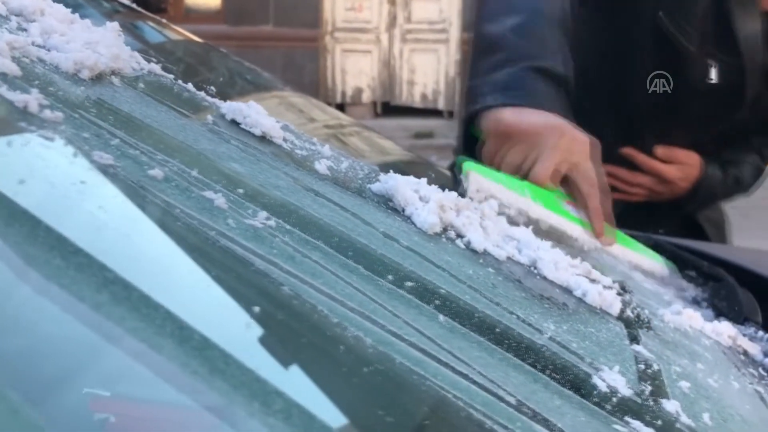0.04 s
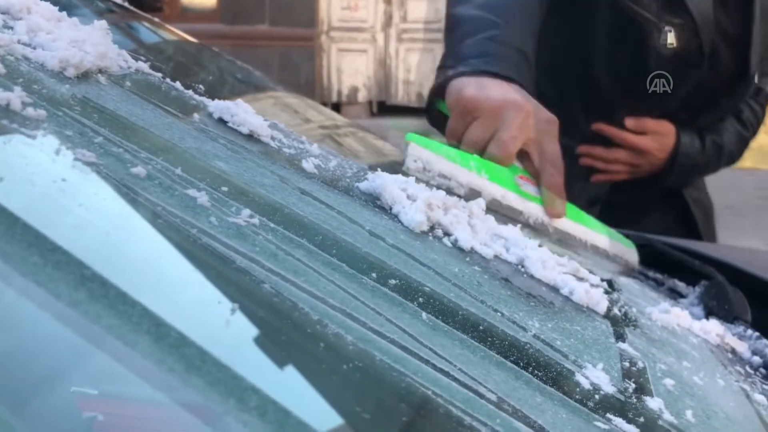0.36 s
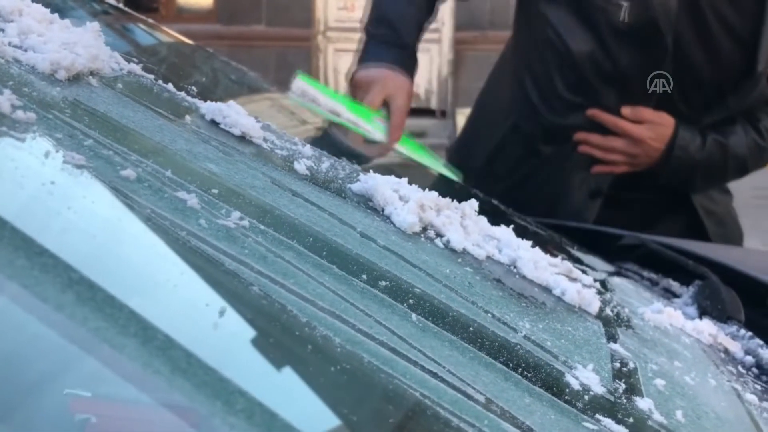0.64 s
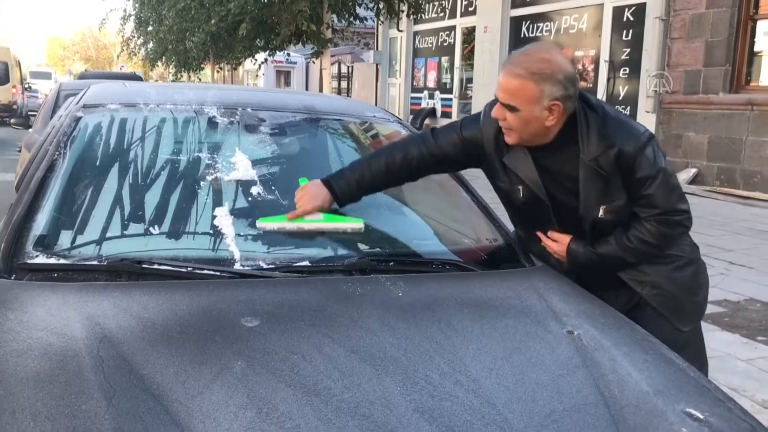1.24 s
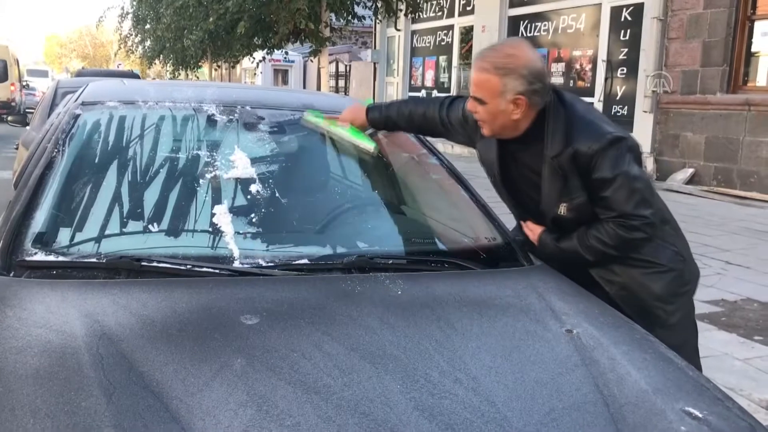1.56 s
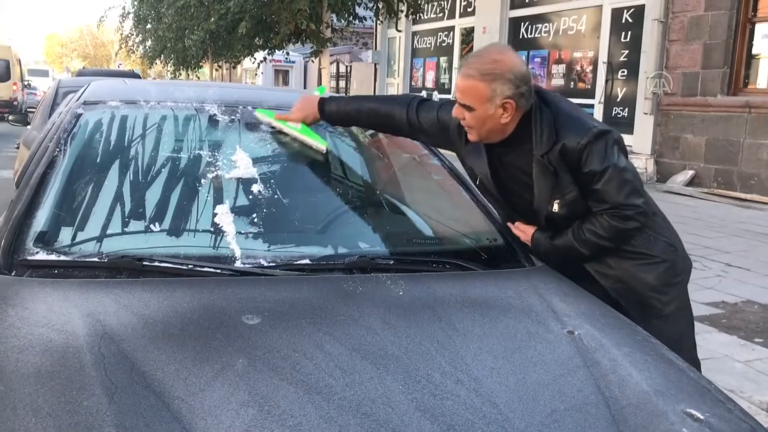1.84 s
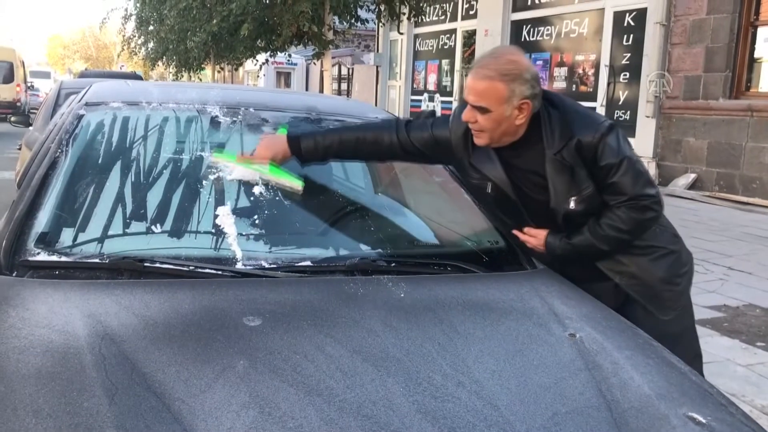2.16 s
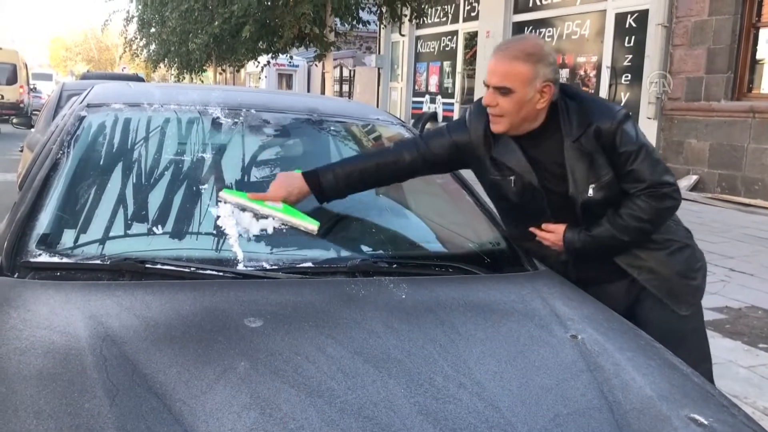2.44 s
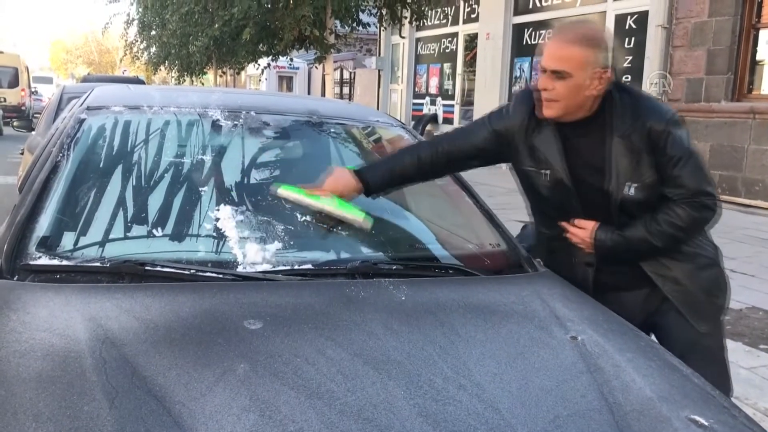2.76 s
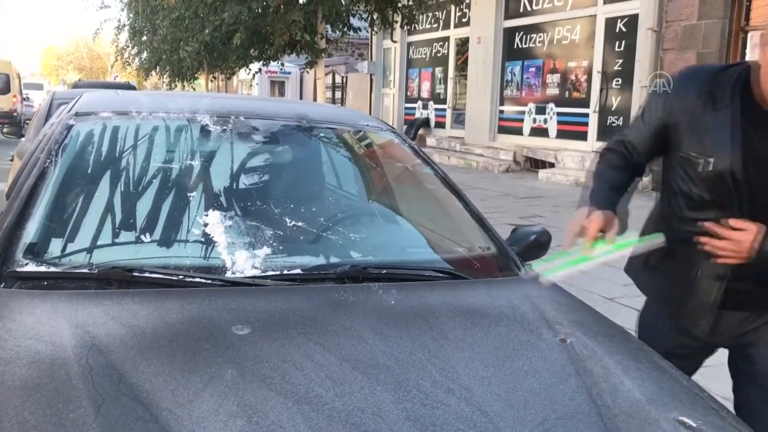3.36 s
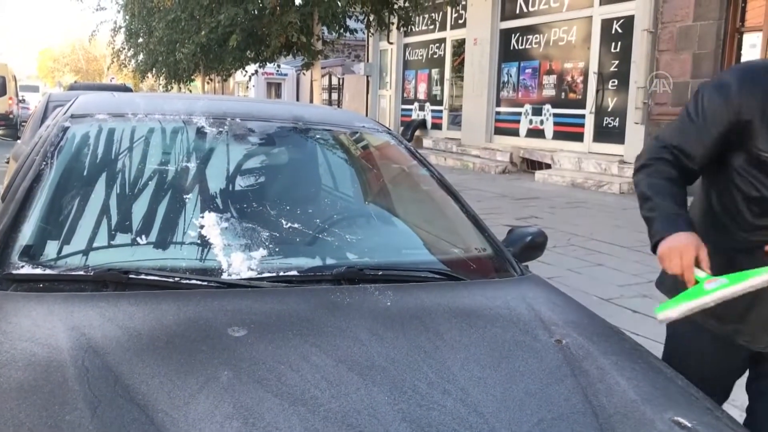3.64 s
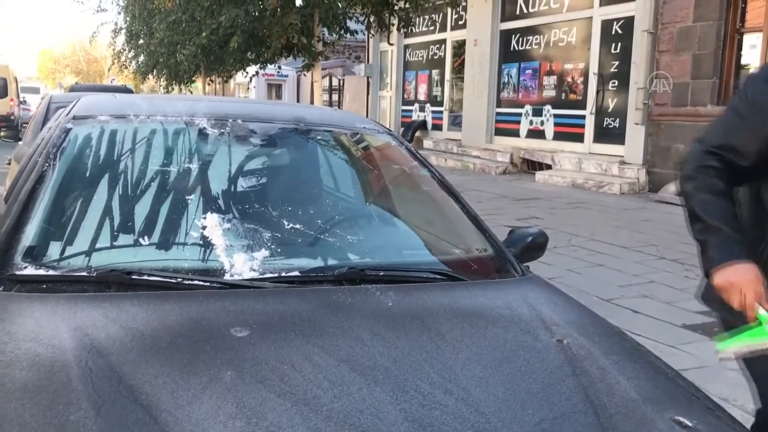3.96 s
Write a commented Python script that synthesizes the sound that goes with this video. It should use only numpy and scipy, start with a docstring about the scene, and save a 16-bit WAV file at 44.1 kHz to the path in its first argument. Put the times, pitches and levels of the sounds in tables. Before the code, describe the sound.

A plastic scraper rasps frost off a car windscreen, starting close with two tiny squeaks and short swipes. After a momentary gap near 0.8 seconds, lighter strokes sound further away. From 1.6 to 2.4 comes one long, crunching pull with snapping ice chips. The scraper knocks on the glass at 2.6 and 2.7, then swipes faintly at 3.3. Traffic rumbles throughout while a low engine drone rises, then falls away.

```python
"""A plastic scraper clears frost from a car windscreen, heard close up, then from in front of the car.
Two stick-slip squeaks and short swipes lead to one long pull down the glass: countless crystals crack
into rasp and crunch, chips snap off and the blade rings. Then the scraper knocks twice on the glass.
Traffic roars and rumbles underneath. A nearby engine gathers speed, droning low with its exhaust note
an octave above, which then falls away."""
import sys
import numpy as np
from scipy import signal
from scipy.fft import rfft, irfft
from scipy.io import wavfile
from scipy.ndimage import uniform_filter1d

SR = 44100
rng = np.random.default_rng(int(sys.argv[2]) if len(sys.argv) > 2 else 0)


def unload_wav(signal):
    """Save mono or channel-first audio to the path in sys.argv[1] as 16-bit WAV at rate SR, clipped to [-1, 1]."""
    wavfile.write(
        sys.argv[1],
        SR,
        np.round(np.clip(np.atleast_2d(signal).T, -1, 1) * 32767).astype(np.int16),
    )


N = 176400
T = np.arange(N) / SR
CLOSE_END_S, WIDE_START_S = 0.7628, 0.811  # a moment of silence separates the two perspectives
RASP_PER_S, RASP_SPREAD_DB, CRUNCH_SPREAD_DB = 14000, 1, 2.5

# spectrum of the blade rasping on frost: f/Hz, level/dB
RASP_SPECTRUM = [(150, -17), (500, -16), (1000, -0.5), (1700, -0.5), (2100, -1.5), (3300, 1.5), (5600, -2),
                 (7200, -6), (9500, -7), (12200, -11.5), (14000, -14), (15500, -15.5)]
# spectrum of breaking frost crystals: f/Hz, level/dB
CRUNCH_SPECTRUM = [(300, -15), (700, -7), (1100, -21), (1700, 6), (2100, 2.5), (2600, 6.5), (3400, 5.5),
                   (4000, -7), (9000, -10), (16000, -21)]


def amp(db):
    """Decibels to gain."""
    return 10 ** (np.asarray(db) / 20)


def unit(x):
    """Scales to rms 1."""
    return x / np.sqrt(np.mean(x ** 2) + 1e-20)


def curves(rows):
    """Turns a timed table into one automation curve per value column."""
    times, *columns = np.transpose(rows)
    return [np.interp(T, times, column) for column in columns]


def add(mix, start, sound):
    """Mixes a sound in at a start time in seconds."""
    part = mix[max(round(start * SR), 0):][:len(sound)]
    part += sound[:len(part)]


def colour(x, spectrum, tilt=0, low_hz=0):
    """EQ: shapes x to a spectrum, tilted in dB per octave and cut under low_hz; rms 1."""
    hz = np.fft.rfftfreq(len(x), 1 / SR) + 1
    points_hz, db = np.transpose(spectrum)
    gain = amp(np.interp(np.log(hz), np.log(points_hz), db) + tilt * np.log2(hz))
    return unit(irfft(rfft(x) * gain / (1 + (low_hz / hz) ** 6), len(x)))


def wander(rate_hz):
    """Smooth random modulation, rms 1."""
    hz = np.fft.rfftfreq(N, 1 / SR)
    return unit(irfft(rfft(rng.standard_normal(N)) * np.exp(-(hz / rate_hz) ** 2), N))


def fractures(per_s, spread_db):
    """Random clicks of uneven size: frost crystals giving way."""
    size = amp(spread_db * np.minimum(rng.exponential(1, N), 4))
    return unit(size * rng.choice([-1, 1], N) * (rng.random(N) < per_s / SR))


def ring(x, hz, width_hz):
    """A steep-sided resonance that can follow a moving pitch."""
    carrier = np.exp(2j * np.pi * np.cumsum(hz * np.ones(len(x))) / SR)
    pole = np.exp(-np.pi * width_hz / SR)
    return unit((carrier * signal.lfilter([1], [1, -2 * pole, pole * pole], x / carrier)).real)


def street():
    """A bed of traffic roar and rumble, louder at the close position; faint hiss rises near the end."""
    # spectra of the close roar, the wide roar and the rumble: f/Hz, level/dB
    close_spectrum = [(59, -31), (100, -2), (188, -10.5), (333, -9), (420, -13), (682, -14), (1260, -16),
                      (1800, -19.5), (1960, -22.5), (3100, -22.5), (4300, -32.5), (5630, -36.5),
                      (10400, -46), (15500, -48)]
    wide_spectrum = [(120, -52), (200, 10), (350, -0.1), (443, -6.5), (680, -4), (780, -6.5), (1360, -7),
                     (1750, -10), (2300, -16), (3050, -18.5), (3500, -18.5), (4400, -24), (6250, -29),
                     (7970, -37.5), (15000, -45.5)]
    rumble_spectrum = [(20, -24), (38, -14.5), (52, 0), (75, 1), (100, -7.5), (135, 0), (185, -7),
                       (260, -20.5), (400, -39), (1000, -72)]
    # traffic from in front of the car: t/s, roar/dB, rumble/dB
    wide_levels = [(.8, -48, -45.5), (1.3, -51.5, -40.5), (1.75, -47, -41), (2.3, -48, -43.5),
                   (2.8, -50, -42), (3.3, -49.5, -47.5), (4, -51, -43.5)]
    # fade-in of the high hiss: t/s, level/dB
    hiss_levels = [(3.5, -100), (3.8, -71.5), (4, -72)]
    roar_db, rumble_db = curves(wide_levels)
    roar_noise, rumble_noise, hiss_noise = rng.standard_normal((3, N))
    close = T < CLOSE_END_S
    close_roar = amp(-40.5) * colour(roar_noise, close_spectrum, low_hz=198)
    wide_roar = amp(roar_db) * colour(roar_noise, wide_spectrum, low_hz=208)
    roar = np.where(close, close_roar, wide_roar) * amp(0.5 * wander(4.1))
    rumble = amp(np.where(close, -38.5, rumble_db)) * colour(rumble_noise, rumble_spectrum)
    hiss = amp(curves(hiss_levels)[0]) * colour(hiss_noise, [(4000, 0), (13000, 1), (16000, -8)])
    return roar + rumble + hiss


def engine_note(rows, flutter_db, waver):
    """One low, wavering note of an engine, heard from its first point on."""
    hz, db = curves(rows)
    phase = 2 * np.pi * np.cumsum(hz * (1 + waver * wander(11.5))) / SR
    return amp(db + flutter_db * wander(25)) * unit(np.sin(phase)) * (T >= rows[0][0])


def engines():
    """A nearby engine gathers speed, droning low; its exhaust note, an octave above, then falls away."""
    # the nearby engine's drone and exhaust note: t/s, f/Hz, level/dB
    drone = [(0, 65.9, -26.5), (.2, 64.3, -30), (.44, 65, -35), (.57, 65.3, -46.5), (.82, 60.7, -41.5),
             (1.6, 66.9, -44), (2.1, 71.75, -42.5), (2.7, 75.8, -55), (3.3, 82.33, -42.5), (4, 81.6, -51.5)]
    exhaust = [(.79, 121.1, -40), (1.05, 125.5, -35.5), (1.4, 131.3, -44), (1.7, 136.4, -35),
               (1.95, 141.4, -45.5), (2.23, 143.5, -39.5), (2.55, 154.2, -48.5), (2.85, 159.1, -44),
               (3.14, 166.8, -51.5), (3.5, 145.4, -45), (4, 115.4, -67.5)]
    # a second, fainter vehicle speeding up: t/s, f/Hz, level/dB
    far_engine = [(.82, 170, -50), (1.55, 184.8, -48), (2.2, 193.6, -71)]
    return (engine_note(drone, flutter_db=-0.5, waver=0.0035)
            + engine_note(exhaust, flutter_db=0.94, waver=0.0077)
            + engine_note(far_engine, flutter_db=0, waver=0.0093))


def frost_dust():
    """Loose frost sprinkles on the glass in a fine, icy crackle."""
    # swell of the sprinkle: t/s, level/dB
    levels = [(.9, -82), (1.1, -72), (1.45, -72), (1.7, -67), (2.3, -58.5), (2.45, -94)]
    spectrum = [(1500, -13), (4000, 0), (9000, 3), (11000, -5), (16000, -5)]  # f/Hz, level/dB
    grains = fractures(per_s=900, spread_db=CRUNCH_SPREAD_DB)
    return amp(curves(levels)[0]) * colour(grains, spectrum)


def knocks():
    """A hard clack and its rebound, the damped ring of the glass, and the car body's slower thud."""
    # scraper hits on the glass: t/s, level/dB, tilt/(dB/octave), rebound/dB, thud/dB
    hits = [(2.5752, -21.5, -2.5, -15, 0), (2.7103, -20.5, 0.6, -27, 0)]
    # modes of car body and glass: f/Hz, level/dB, t60/s, delay/s
    modes = [(200, -0.5, 0.067, 0.01557), (245, -9.5, 0.078, 0.00076), (347, -11.5, 0.054, 0.00304),
             (668, -5.5, 0.072, 0.00128), (778, -3, 0.025, 0.0012), (961, -17.5, 0.091, 0.0012),
             (1220, -9, 0.035, 0.00079), (1541, -12, 0.03, 0.001188), (2220, -15, 0.021, 0.001538),
             (2820, -6, 0.012, 0.00148), (3440, -11, 0.016, 0.00145)]
    clack_hz, peak_s, width_s, rebound_s = 1040, 0.00136, 0.00066, 0.00634
    body_below_hz, glass_rise_s, tick_decay_s = 300, 0.00029, 0.004
    out, t = np.zeros(N), np.arange(SR // 2) / SR
    contact = np.exp(-((t - peak_s) / width_s) ** 2)
    clack = amp(7.5) * contact * np.sin(2 * np.pi * clack_hz * (peak_s - t))
    for start, db, tilt, rebound_db, thud_db in hits:
        tick = amp(-22) * colour(rng.standard_normal(len(t)), RASP_SPECTRUM) * np.exp(-t / tick_decay_s)
        knock = clack + tick
        for hz, mode_db, t60, delay in modes:
            is_body = hz < body_below_hz
            trim_db = thud_db if is_body else tilt * np.log2(hz / 1000)
            rise_s = 0.5 / hz if is_body else glass_rise_s
            age = np.maximum(t - delay, 0)
            envelope = amp(mode_db + trim_db - 60 * age / t60) * np.minimum(age / rise_s, 1)
            knock += envelope * np.cos(2 * np.pi * hz * age)
        add(out, start, amp(db) * knock)
        add(out, start + rebound_s, amp(db + rebound_db) * clack)
    return out


def squeaks():
    """The edge sticks and slips on bare glass, its pitch sagging."""
    # stick-slip bursts: t/s, length/s, f/Hz, level/dB
    slips = [(0, 0.0045, 4660, -24.5), (0.069, 0.0047, 4600, -41), (0.0745, 0.022, 4395, -25.5)]
    # harmonics from the fundamental up: level/dB
    partials = [0, -29, -21.5]
    sag_hz_per_s, fade_db_per_s, edge_s, jitter = 8700, 197, 0.00092, 0.0068
    out = np.zeros(N)
    for start, length, hz, db in slips:
        t = np.arange(0, length, 1 / SR)
        pitch = (hz - sag_hz_per_s * t) * (1 + jitter * wander(600)[:len(t)])
        phase = 2 * np.pi * np.cumsum(pitch) / SR
        tone = sum(amp(level) * np.sin(k * phase) for k, level in enumerate(partials, 1))
        gate = np.minimum(np.minimum(t, length - t) / edge_s, 1)
        add(out, start, unit(tone) * amp(db - fade_db_per_s * t) * gate)
    return out


def chips():
    """The blade clicks free at the end of the first swipe; later, larger flakes snap off in brief bursts, each
    setting one resonance of the blade ringing."""
    # a click as the blade lifts off at the end of the first swipe, then chips of ice: t/s, snap/dB, ring f/Hz,
    # ring/dB
    flakes = [(0.094, -40.5, 4000, -40), (1.349, -54.5, 5500, -65), (1.363, -66, 5590, -65),
              (1.397, -54.5, 9360, -65), (1.484, -57, 8400, -64), (1.614, -45, 720, -40.5),
              (1.774, -40, 1680, -38.5), (1.823, -39, 900, -43.5), (1.845, -43, 1730, -39),
              (1.879, -53, 1630, -36.5), (3.63, -68, 9500, -68)]
    decay_s = 0.0064
    out, t = np.zeros(N), np.arange(SR // 10) / SR
    snap = colour(rng.standard_normal(N), CRUNCH_SPECTRUM, tilt=3)
    fade = np.exp(-t / decay_s)
    fade_rms = np.sqrt(np.mean(fade ** 2))
    for start, snap_db, hz, ring_db in flakes:
        out += amp(snap_db) * (T >= start) * np.exp(-abs(T - start) / decay_s) * snap
        blade = ring(rng.standard_normal(SR // 4), hz, width_hz=320)[-len(t):]
        add(out, start, amp(ring_db) * unit(blade * fade) * fade_rms)
    return out


def catches():
    """The blade catches: brief judders in which one of its resonances stands out."""
    # judders: t/s, length/s, f/Hz, level/dB
    judders = [(1.422, .03, 3900, -63), (1.685, 0.019, 2950, -50.5), (1.693, 0.038, 675, -51),
               (1.772, 0.013, 3370, -50), (1.887, 0.051, 1680, -51), (1.922, 0.022, 1160, -47.5),
               (2.023, 0.05, 595, -52.5), (2.168, .08, 1330, -49.5), (2.261, 0.066, 1496, -50),
               (2.476, .1, 680, -55)]
    out = np.zeros(N)
    for start, length, hz, db in judders:
        t = np.arange(0, length, 1 / SR)
        blade = ring(rng.standard_normal(SR // 4), hz, width_hz=380)[-len(t):]
        swell = np.sin(np.pi * np.sqrt(t / length))
        add(out, start, amp(db) * unit(blade * swell))
    return out


def swipes():
    """Each short swipe presses in, rasps over the frost and lifts off."""
    # strokes: t/s, length/s, rise/s, fall/s, level/dB, tilt/(dB/octave)
    strokes = [(0, 0.1, 0.0013, 0.0043, -41.5, -1), (0.146, 0.18, 0.076, 0.031, -44, -1),
               (0.403, 0.054, 0.0076, 0.012, -51.5, 0.5), (0.47, 0.039, .012, .015, -55, 1),
               (0.542, .06, .03, .025, -53, 1.5), (0.811, 0.14, 0.0044, 0.11, -47.5, 0.5),
               (1.023, 0.13, 0.087, 0.024, -55.5, 2), (1.144, 0.051, .008, .015, -60.5, 0.5),
               (1.24, 0.077, .015, 0.043, -56.5, -2), (1.412, 0.038, 0.02, 0.014, -53, 0),
               (1.487, 0.088, 0.035, 0.045, -58, 0), (3.264, 0.091, 0.015, 0.087, -54.5, -4)]
    out, grains = np.zeros(N), fractures(RASP_PER_S, RASP_SPREAD_DB)
    for start, length, rise, fall, db, tilt in strokes:
        pressure = np.clip(np.minimum((T - start) / rise, (start + length - T) / fall), 0, 1)
        out += amp(db) * pressure * colour(grains, RASP_SPECTRUM, tilt)
    roughness = amp(1.3 * wander(79))
    return out * roughness


def long_pull():
    """The blade bites into thick frost, crunches through it and rings as it drags down the glass."""
    # the gesture: t/s, rasp/dB, brightness (-2 fully dull, +2 fully bright), crunch/dB, blade ring/dB
    gesture = [(1.58, -63, -1, -73, -70), (1.63, -59.5, 7, -57.5, -66), (1.7, -53, 5, -50.5, -55.5),
               (1.78, -42, 9, -47, -71), (1.86, -45.5, 2, -49, -56), (1.96, -47.5, .5, -53.5, -53),
               (2.06, -45, -0.5, -57, -52), (2.18, -52, -0.5, -60, -48.5), (2.3, -45, -2, -72, -54),
               (2.345, -62.5, -5, -70, -79), (2.45, -69, -3, -77, -73)]
    # resonances of blade and glass: f/Hz, width/Hz, level/dB
    resonances = [(674, 110, -5), (1285, 230, -3), (1570, 410, 0.5), (3250, 230, -12), (4400, 540, 0)]
    rasp_db, brightness, crunch_db, blade_db = curves(gesture)
    grains = fractures(RASP_PER_S, RASP_SPREAD_DB)
    bright, dull = colour(grains, RASP_SPECTRUM, tilt=4.5), colour(grains, RASP_SPECTRUM, tilt=-2.8)
    blend = np.clip(0.5 + brightness / 4, 0, 1)
    rasp = amp(rasp_db) * (blend * bright + (1 - blend) * dull)
    crunch = amp(crunch_db) * colour(fractures(per_s=1100, spread_db=CRUNCH_SPREAD_DB), CRUNCH_SPECTRUM)
    drag, ringing = fractures(RASP_PER_S, RASP_SPREAD_DB), np.zeros(N)
    for hz, width_hz, db in resonances:
        flicker_db = 2.2 * wander(25)
        drifting_hz = hz * (1 + 0.024 * wander(13))
        ringing += amp(db + flicker_db) * ring(drag, drifting_hz, width_hz)
    blade = amp(blade_db) * unit(ringing)
    roughness = amp(0.65 * wander(71))
    on_glass = (T > gesture[0][0]) & (T < gesture[-1][0])
    return (rasp + crunch + blade) * roughness * on_glass


def scene():
    """The scraper over the street bed, in mono."""
    hum = engines()
    scraper = swipes() + long_pull() + catches() + chips() + squeaks() + knocks()
    return (scraper + street() + hum + frost_dust())[None]


def record(dry):
    """The microphone hollows a few bands, the sound drops out between positions, and the top is cut."""
    # narrow hollows in the microphone's response: f/Hz, width/Hz, level/dB
    dips = [(3850, 140, -1.5), (4900, 330, -3), (7620, 250, -2), (10420, 380, -4.5)]
    hz = np.fft.rfftfreq(N, 1 / SR)
    response_db = sum(db * np.exp(-((hz - centre) / width) ** 2) for centre, width, db in dips)
    heard = irfft(rfft(dry) * amp(response_db), N)
    gate = uniform_filter1d(1.0 * ((T < CLOSE_END_S) | (T > WIDE_START_S)), size=64)
    lowpass = signal.firwin(511, cutoff=15900, window=("kaiser", 9), fs=SR)
    return signal.oaconvolve(heard * gate, lowpass[None], "same")


dry = scene()
out = record(dry)
unload_wav(out)
```